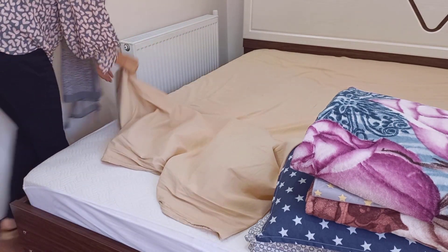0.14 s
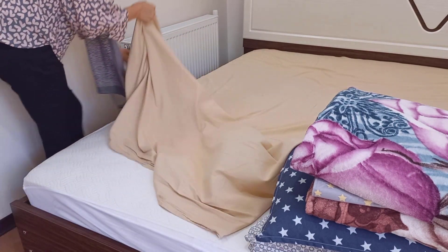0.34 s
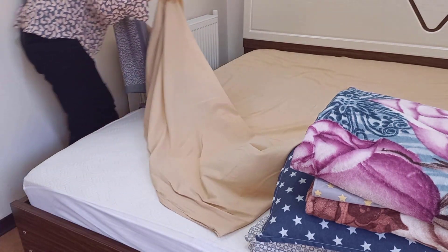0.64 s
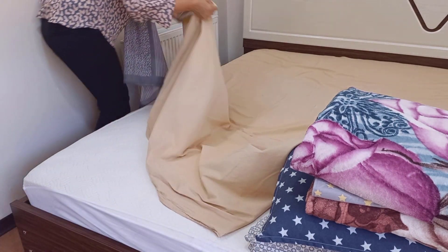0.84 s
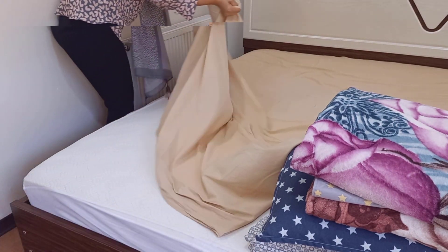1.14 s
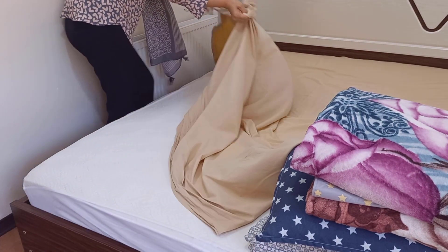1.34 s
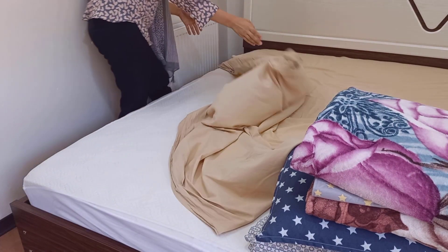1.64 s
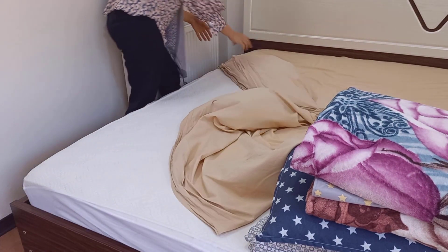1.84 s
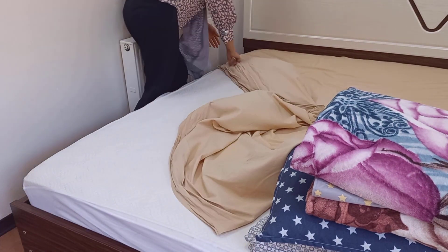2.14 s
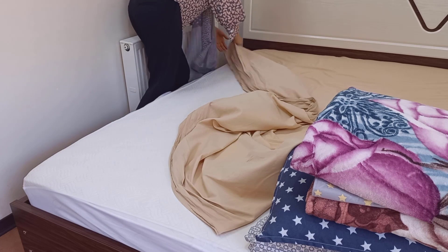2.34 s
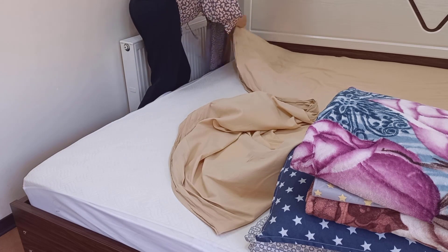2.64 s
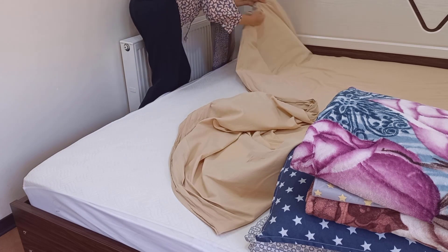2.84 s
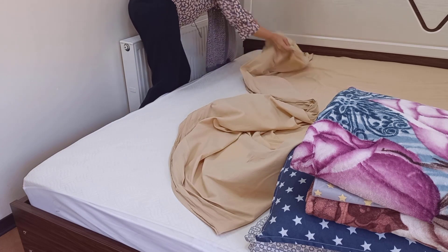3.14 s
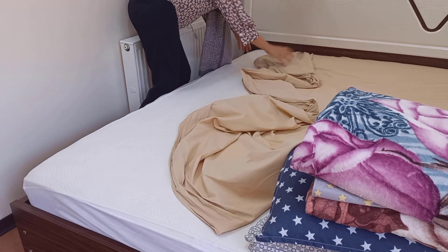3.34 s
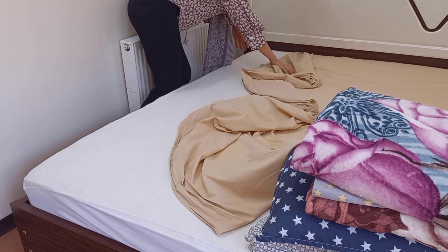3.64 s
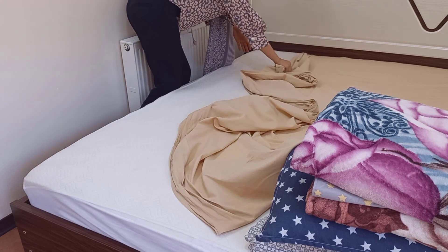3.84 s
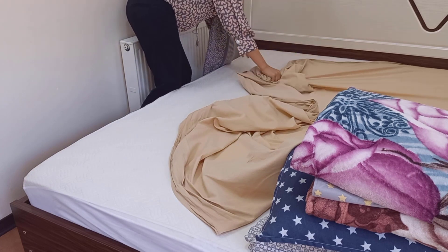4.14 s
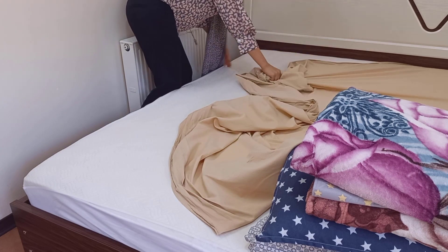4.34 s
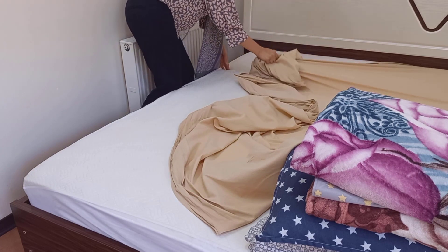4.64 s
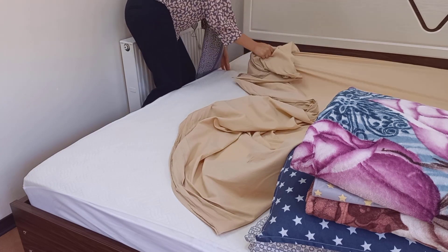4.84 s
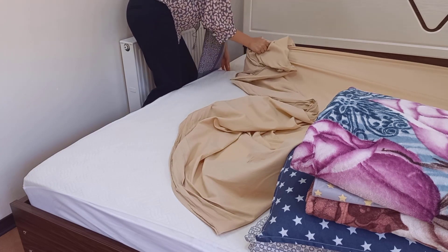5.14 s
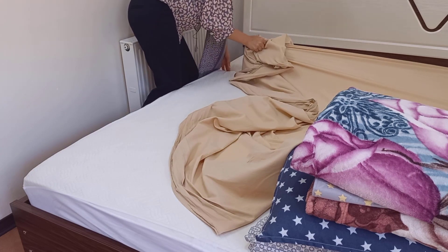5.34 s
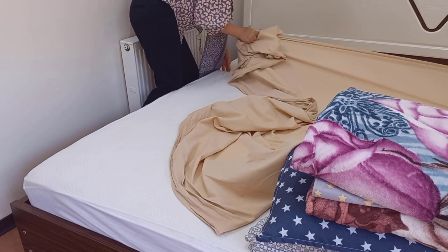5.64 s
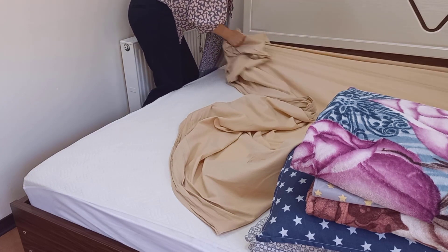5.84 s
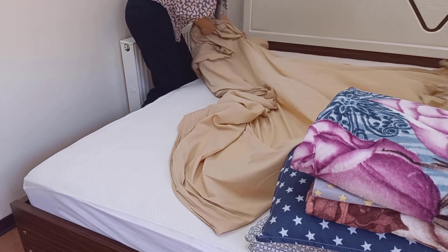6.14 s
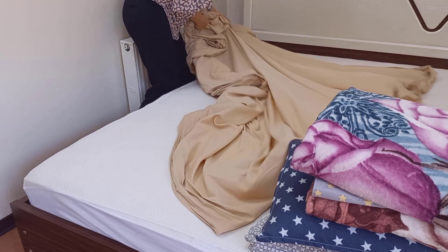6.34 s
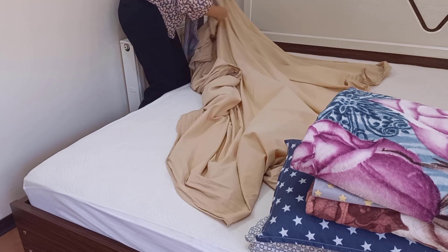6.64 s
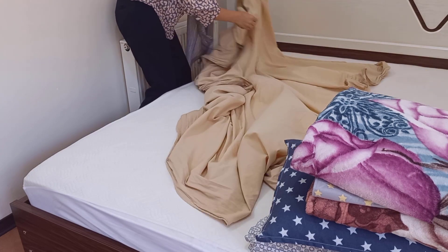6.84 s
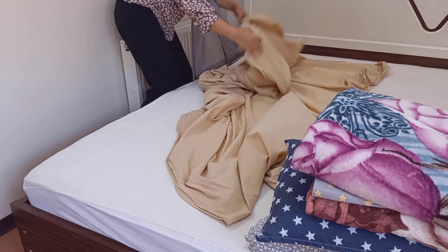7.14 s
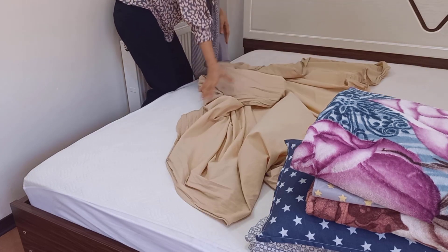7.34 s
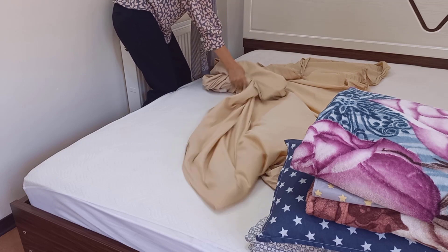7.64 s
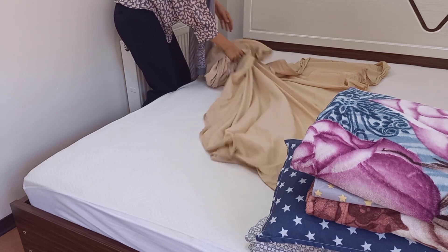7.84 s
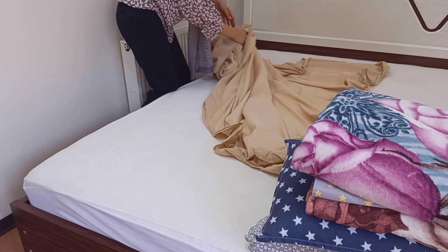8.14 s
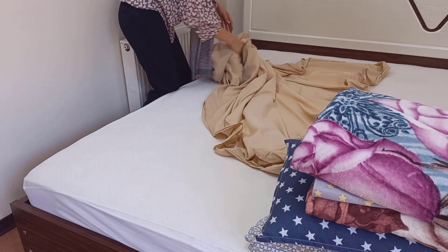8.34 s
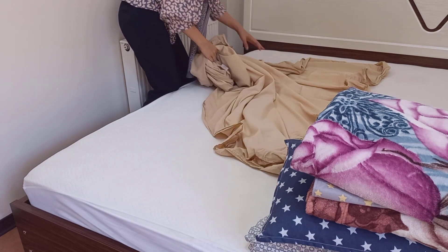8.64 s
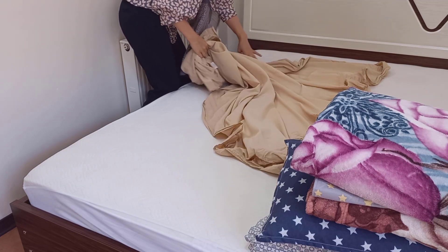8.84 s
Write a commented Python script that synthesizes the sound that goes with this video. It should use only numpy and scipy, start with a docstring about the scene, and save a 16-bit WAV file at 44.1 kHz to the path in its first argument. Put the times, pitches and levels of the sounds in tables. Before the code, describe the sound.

A small bedroom murmurs steadily and quietly while a cotton sheet is worked over a mattress, heard close in stereo, slightly left. From 0 s, pulls make breathy swishes, with a rising whirr of cloth in the first third of a second. At about 1.1 s a flap cracks into a huge low boom with quick after-thumps; at 1.7 s a second, softer-edged but equally heavy whoomp follows, both overloading. Between 2 and 3.3 s, short rustles and lighter thuds. From 3.5 to 5.4 s, uneven rubbing and dragging, with low bed rumbles strongest near 4.8 and 5.1 s. Around 5.6 to 6.5 s the sheet is hauled briskly, the fullest swishing, then it quietens. Rustling returns at 7.5 s; sharp static snaps tick at 7.8 to 7.95 s, the last loudest. Soft, dull flaps and bed rumble come at 8.4 to 8.6 s, then a final small spark near 8.9 s.

```python
"""A cotton sheet is lifted, shaken and dragged across a mattress in a small, quietly murmuring bedroom.
From the start, pulls on the sheet make swishes of shaped noise, gliding noise bands whirr or swish dully
and the bed rumbles under leaning weight. From 0.8 s folds flap: noise puffs and slaps join decaying sine
room modes that boom, and the big thumps near 1.1 and 1.7 s overload the two closely spaced microphones.
From 7.8 s static sparks snap as tiny noise bursts, with a few last soft flaps among them."""
import sys
import numpy as np
from scipy import signal
from scipy.fft import irfft, next_fast_len
from scipy.io import wavfile

SR = 44100
rng = np.random.default_rng(int(sys.argv[2]) if len(sys.argv) > 2 else 0)


def dump(signal):
    """Clip the signal to [-1, 1] and save it as 16-bit WAV at the path in sys.argv[1]."""
    limited = np.clip(np.atleast_2d(signal).T, -1, 1)
    pcm = np.round(limited * 32767).astype(np.int16)
    wavfile.write(sys.argv[1], SR, pcm)


N = 396459
TIME = np.arange(N) / SR
BIN_HZ = np.fft.rfftfreq(next_fast_len(N), 1 / SR)


def from_db(db):
    """Decibels to amplitude gain."""
    return 10 ** (np.asarray(db) / 20)


def rms_one(x):
    """Scale to unit rms."""
    return x / np.sqrt(np.mean(x ** 2) + 1e-20)


def pan(x, left_db):
    """Make the left side louder than the right by left_db."""
    return x * from_db([[left_db / 2], [-left_db / 2]])


def add(track, s, sound):
    """Mix a sound into a track from time s on."""
    start = round(s * SR)
    track[..., start:start + sound.shape[-1]] += sound[..., :N - start]


def drift(rate):
    """Slow random wander with about `rate` turns a second: twice-smoothed noise of rms 1."""
    step = 40  # samples between the points of the wander
    settle = 2000  # points dropped while the filter settles
    r = np.exp(-2 * np.pi * rate * step / SR)
    noise = rng.standard_normal(N // step + settle + 2)
    slow = rms_one(signal.lfilter([1], [1, -2 * r, r * r], noise)[settle:])
    return np.interp(np.arange(N) / step, np.arange(len(slow)), slow)


def room_noise(spectrum):
    """Coloured noise as two microphones hear it in a room: mostly diffuse, partly direct; rms 1."""
    mic_spacing_m, sound_speed = 0.21, 343  # m, m/s
    left_lag_s, direct_share = 0.000439, 0.061  # direct sound: lag of the left side, share of the power
    ripple_spacing_hz, ripple_depth = 5.9, 1
    hz, level_db = np.transpose(spectrum)
    colour = from_db(np.interp(np.log(BIN_HZ + 1), np.log(hz), level_db))
    # an even ripple in the spectrum, as from a faint echo 0.17 s later,
    # roughens the low and middle tones
    ripple = np.cos(2 * np.pi * BIN_HZ / ripple_spacing_hz)
    colour *= 1 + ripple_depth / (1 + BIN_HZ / 3000) * ripple
    mid, side, straight = rng.standard_normal((3, 2 * len(BIN_HZ))).view(complex)
    # long waves reach both microphones alike, short ones do not
    alike = np.sinc(2 * BIN_HZ * mic_spacing_m / sound_speed) * 0.95
    diffuse = np.sqrt((1 + alike) / 2) * mid + np.sqrt((1 - alike) / 2) * side * [[1], [-1]]
    direct = np.array([straight * np.exp(-2j * np.pi * BIN_HZ * left_lag_s), straight])
    both = np.sqrt(1 - direct_share) * diffuse + np.sqrt(direct_share) * direct
    return rms_one(irfft(colour * both, next_fast_len(N))[:, :N])


def swell_and_die(swell, t60):
    """One second of an envelope that builds up (time constant in s) and dies away (60 dB in t60 s)."""
    t = TIME[:SR]
    return (1 - np.exp(-t / max(swell, 1e-4))) * from_db(-60 * t / t60)


def linger(power):
    """The room holds a sound for a moment: power in, level in dB out."""
    t60 = 0.29  # s
    keep = from_db(-120 / (t60 * SR))  # power falls 60 dB in t60
    return 10 * np.log10(signal.lfilter([1 - keep], [1, -keep], power + 1e-12))


def still_room():
    """The still room murmurs as steady coloured noise."""
    # Murmur colour. Each row: frequency in Hz, relative density in dB per Hz.
    murmur_spectrum = [(18, -34), (30, -52), (60, -3.5), (97, -1.5), (150, -8), (550, -8.5), (780, -8),
                       (1020, -7), (1400, -10.5), (1870, -12.5), (2700, -29.5), (5400, -31), (7000, -25.5),
                       (9400, -32), (15500, -32)]
    return from_db(-39.5) * room_noise(murmur_spectrum)


def pull_levels():
    """Each pull speeds up, holds and slows down, and each sound's amplitude is a power of the speed."""
    # Pulls on the sheet. Each row: start in seconds, speed-up in seconds, hold in seconds,
    # slow-down in seconds, cloth-on-cloth rub in dB, then in dB relative to the rub: brush on
    # the mattress, hiss of taut weave, drag of bunched cloth. All before lingering and trims.
    pull_rows = [(-0.1, 0.23, 0.31, 0.21, -38, 4, -3.5, 5), (0.129, .17, 0.044, 0.14, -31.5, -21, -6, 2.5),
                 (0.42, 0.072, 0.047, 0.12, -39.5, -8, 1, 6), (0.547, 0.078, 0.11, .1, -48.5, 7, 0.5, 12.5),
                 (0.718, 0.21, 0.094, 0.13, -30.5, -5, -4.5, 0.5),
                 (0.994, .06, 0.069, .14, -38, 7.5, -3, 4), (1.25, .12, 0.27, .1, -61.5, 13.5, 3, 17),
                 (1.8, 0.12, 0.052, 0.32, -53, 8.5, -5, 21), (2.149, .09, 0.0092, .05, -40, 0.5, -6, 5.5),
                 (2.296, .11, 0.073, 0.23, -37, 1.5, -4, -1), (2.566, .12, .02, 0.12, -35, 0, -3.5, -4),
                 (2.7, 0.052, 0.037, 0.13, -37.5, 4, -8, 3.5), (2.98, 0.058, .02, .09, -53.5, 16, 3, 11),
                 (3.146, 0.085, 0.028, 0.11, -53.5, 11.5, -2, 16),
                 (3.504, 0.16, .1, 0.092, -50.5, 6, -2, -8), (3.674, 0.11, 0.1, .14, -42, 3, -9.5, 1),
                 (3.921, 0.072, 0.18, .09, -35.5, 3.5, -5, 1), (4.052, 0.049, 0.066, .13, -34, 4.5, -12, 3),
                 (4.25, .2, 0.092, .14, -49, 5, -5.5, 5), (4.52, 0.1, 0.072, .1, -48.5, -1, 2, -3),
                 (4.612, 0.22, 0.06, .3, -36.5, 0, -1.5, -2), (4.914, 0.15, 0.48, .16, -39, 0.5, -2, 0.5),
                 (5.545, 0.12, 0.042, 0.15, -27, 0.5, -1, 4),
                 (5.752, 0.15, 0.064, 0.079, -27.5, 0, -4, 3.5),
                 (5.97, 0.073, 0.087, 0.25, -34.5, 2.5, -10.5, 1),
                 (6.217, .21, 0.17, .17, -35, 2.5, -10.5, -3.5),
                 (6.72, 0.23, 0.43, .13, -62.5, 13.5, 3, 10), (7.494, 0.19, 0.23, 0.2, -33, 0, -10, -3),
                 (7.7, 0.17, 0.14, 0.13, -35, 1.5, -11, -2), (8.693, 0.056, 0.11, 0.12, -55, 6, 8.5, 7)]
    # rows of the result: brush, rub, hiss, drag
    speed_powers = np.array([[0.55], [0.79], [0.72], [0.85]])
    # the bunched cloth stirs faintly throughout: brush and drag never quite stop
    held_db = [[-54], [-np.inf], [-np.inf], [-49]]
    power = np.zeros((4, N)) + from_db(held_db) ** 2
    for s, rise, hold, fall, rub_db, brush_db, hiss_db, drag_db in pull_rows:
        t = TIME[(TIME >= s) & (TIME < s + rise + hold + fall)] - s
        ramp = np.interp(t, np.cumsum([0, rise, hold, fall]), [0, 1, 1, 0])
        speed = np.sin(np.pi / 2 * ramp) ** 2
        peak_db = rub_db + np.array([[brush_db], [0], [hiss_db], [drag_db]])
        add(power, max(s, 0), (from_db(peak_db) * speed ** speed_powers) ** 2)
    return linger(power)


def sliding_cloth(brush_db, rub_db, hiss_db):
    """Folds catch and slip as the sheet slides, and the threads add a fine grain."""
    # Colours of the mattress brush, cloth-on-cloth rub and taut-weave hiss.
    # Each row: frequency in Hz, relative density in dB per Hz.
    brush_spectrum = [(300, -24), (600, -0.5), (900, 1.5), (1300, 1), (2000, -5), (2900, -16), (6000, -50)]
    rub_spectrum = [(600, -13), (1500, -2.5), (2300, 2), (3000, 1), (4100, 0), (5500, -4.5), (7200, -8),
                    (9000, -13.5), (15000, -30)]
    hiss_spectrum = [(2500, -27), (5000, 0), (7000, 0.5), (8500, -3), (10000, 0), (12200, 2.5), (14000, 0),
                     (16000, -2.5)]
    brush_trim_db, rub_trim_db, hiss_trim_db = 3.0, 4.0, 5.0
    catch_db, grain_db = 0.5, 0.06  # rms wander of the level
    friction_db = catch_db * drift(31) + grain_db * drift(400)
    brush = from_db(brush_db + brush_trim_db) * room_noise(brush_spectrum)
    rub = from_db(rub_db + rub_trim_db) * room_noise(rub_spectrum)
    hiss = from_db(hiss_db + hiss_trim_db) * room_noise(hiss_spectrum)
    return from_db(friction_db) * (brush + rub + hiss)


def cloth_bands():
    """Moving cloth as bands of noise that glide, swell and fade: narrow ones whirr, wide ones swish dully."""
    # Pitched and breathy cloth bands: narrow ones whirr, wide ones are dull swishes and puffs of
    # moving cloth. Each row: start in seconds, length in seconds, start pitch in Hz, end pitch
    # in Hz, half-width of the band as a share of the start pitch, level in dB before panning.
    band_rows = [(0.0, 0.11, 784, 1044, 0.09, -31), (0.056, .22, 1050, 1987, 0.13, -32),
                 (0.849, 0.3, 2910, 3780, 0.16, -32), (1.72, 0.12, 2210, 2010, .13, -27),
                 (1.92, 0.18, 490, 461, 0.16, -33), (2.721, 0.25, 519, 431, .3, -32),
                 (3.262, 0.2, 451.4, 488, 0.36, -36), (4.047, 0.2, 245.4, 225.6, 0.19, -27.5),
                 (4.4, 0.233, 864, 812, 0.033, -38), (4.799, 0.25, 477.5, 559.6, 0.49, -29.5),
                 (5.605, 0.12, 406, 341, 0.2, -26.5), (5.821, 0.29, 652.5, 562, 0.17, -29.5),
                 (8.37, 0.359, 500, 430, 0.35, -34)]
    out = np.zeros((2, N))
    for s, length, start_hz, end_hz, width, level_db in band_rows:
        progress = np.minimum(TIME[:SR] / length, 1)
        pitch_hz = start_hz + (end_hz - start_hz) * progress
        phase = 2 * np.pi * np.cumsum(pitch_hz) / SR
        # slow noise on a carrier becomes a band around the gliding pitch
        unevenness = signal.butter(2, np.clip(width * start_hz, 5, 5000), fs=SR, output="sos")
        a, b = signal.sosfilt(unevenness, rng.standard_normal((2, 2, SR)))
        band = rms_one(a * np.cos(phase) + b * np.sin(phase))
        add(out, max(s, 0), from_db(level_db) * np.sin(np.pi * progress) * band)
    return out


def lean_level():
    """The bed's rumble swells and fades as weight leans on it; level in dB."""
    # Leans on the bed. Each row: start in seconds, length in seconds,
    # rumble in dB before lingering and trim.
    lean_rows = [(0.22, 0.22, -41), (0.68, .1, -40.5), (0.858, 0.16, -37), (2.76, 0.25, -36),
                 (3.7, 0.15, -40), (4.004, 0.17, -34.5), (4.46, 0.18, -40), (4.73, .16, -29.5),
                 (4.898, 0.15, -35), (5.08, 0.22, -29), (5.68, 0.54, -30.5), (6.33, 0.32, -38),
                 (7.06, 0.27, -37.5), (7.565, 0.8, -33), (8.56, 0.26, -28.5), (8.723, 0.36, -34)]
    resting_rumble_db = -49
    power = np.full(N, from_db(resting_rumble_db) ** 2)
    for s, length, level_db in lean_rows:
        swell = np.sin(np.pi * TIME[TIME < length] / length)
        add(power, s, (from_db(level_db) * swell) ** 2)
    return linger(power)


def moving_weight(rumble_db, drag_db):
    """The bunched cloth drags in lumps, and the bed drones softly around its lowest resonance."""
    # Colours of the bed rumble and the cloth drag.
    # Each row: frequency in Hz, relative density in dB per Hz.
    rumble_spectrum = [(20, -37), (45, -34), (65, -2.5), (85, -31), (101, 13), (120, -7.5), (170, -8.5),
                       (300, -9.5), (700, -67)]
    drag_spectrum = [(70, -31), (140, 0.5), (235, 1.5), (340, -0.5), (520, 0.5), (700, -9.5), (1000, -10.5),
                     (2000, -33.5)]
    rumble_trim_db, drag_trim_db = 0.5, 1.5
    lumps_db = 0.6 * drift(6.9)
    rumble = from_db(rumble_db + rumble_trim_db) * room_noise(rumble_spectrum)
    drag = from_db(drag_db + drag_trim_db + lumps_db) * room_noise(drag_spectrum)
    return pan(rumble, left_db=-3.5) + pan(drag, left_db=3.0)


def flaps():
    """Each flap shoves air into the room's standing waves; which ones answer depends on where it happens."""
    # Flaps of the sheet. Each row: start in seconds, room ring in dB before its trim, dull puff of air
    # in dB, bright slap in dB (both before their envelopes), swell time of the ring and puff in
    # seconds, place in the room from 0 to 1.
    flap_rows = [(0.769, -26, -36, -70, 0.03, 1), (1.089, 4, -3, -33, 0.0025, 0.43),
                 (1.118, -1.5, -12.5, -30.5, 0.0015, 0.13), (1.15, -7.5, -24, -59, 0.0023, 0.32),
                 (1.717, 3, 3.5, -17.5, 0.034, 1), (2.717, -19.5, -25, -41, .015, 1),
                 (2.788, -21.5, -22, -41, 0.0072, 1), (2.914, -30, -30, -63, 0.0077, 0.5),
                 (3.239, -41, -30.5, -62, 0.015, 0.7), (4.098, -29.5, -27, -33, 0.008, 0.1),
                 (5.61, -42, -28, -40, 0.039, 0.5), (8.385, -18.5, -18.5, -75, 0.032, 0.23),
                 (8.436, -21.5, -32, -66, 0.011, 0.05), (8.514, -25, -26.5, -62, 0.008, 0.1),
                 (8.6, -27.5, -26, -70, 0.027, 0.06)]
    # Standing waves of the room. Each row: frequency in Hz, 60 dB decay time in seconds,
    # answer in dB to a flap at place 0, answer in dB to a flap at place 1.
    mode_rows = [(60.3, 0.34, -8.5, -25), (75.7, 0.52, -37, -12), (100.8, 0.33, -0.5, -38),
                 (121.9, 0.41, -6, -14), (138.2, 0.24, -11, -0.5), (160.2, 0.29, -9, -2),
                 (196.5, 0.31, 3.5, -10), (210.9, .38, -26, -9), (237.4, 0.53, -20, -10.5),
                 (290, 0.23, -7, -30), (328.6, 0.43, -9.5, -12), (441, 0.29, -37, -17.5),
                 (510.6, 0.36, -24.5, -37)]
    # Colours of the puff and the slap. Each row: frequency in Hz, relative density in dB per Hz.
    puff_spectrum = [(20, -18), (45, -17), (75, 1.5), (150, 2), (240, -1), (350, -6.5), (500, -18.5),
                     (900, -24.5), (1600, -28), (4000, -63)]
    slap_spectrum = [(200, -32), (600, 0), (1200, 4.5), (2200, -1.5), (3000, -2.5), (4300, -4.5),
                     (6500, -10.5), (9000, -17.5), (15000, -25)]
    ring_trim_db = 2.5
    ring, puff, slap = np.zeros((3, N))
    for s, ring_db, puff_db, slap_db, swell, place in flap_rows:
        for k, (hz, t60, first_db, second_db) in enumerate(mode_rows):
            answer_db = np.interp(place, [0, 1], [first_db, second_db])
            # neighbouring modes start in opposite directions
            gain = (-1) ** k * from_db(ring_trim_db + ring_db + answer_db)
            add(ring, s, gain * swell_and_die(swell, t60) * np.sin(2 * np.pi * hz * TIME[:SR]))
        add(puff, s, from_db(puff_db) * swell_and_die(swell, t60=0.39))
        add(slap, s, from_db(slap_db) * swell_and_die(swell=0.0083, t60=0.6))
    return ring + puff * room_noise(puff_spectrum) + slap * room_noise(slap_spectrum)


def sparks():
    """Static snaps: a very short crack of noise, then its scatter from the walls."""
    # Static sparks. Each row: start in seconds, crack in dB, room tail in dB, before the envelopes.
    spark_rows = [(7.809, -12, -41), (7.8676, -8, -35), (7.9425, -2.5, -23.5), (8.743, -39, -38),
                  (8.8776, -17, -36)]
    # Colour of the crack. Each row: frequency in Hz, relative density in dB per Hz.
    crack_spectrum = [(1000, -24), (3000, -7), (6000, 1), (12000, 3), (16000, -0.5)]
    wall_delay = 0.0034  # s
    envelope = np.zeros(N)
    for s, crack_db, tail_db in spark_rows:
        add(envelope, s, from_db(crack_db) * swell_and_die(swell=0, t60=0.0033))
        add(envelope, s + wall_delay, from_db(tail_db) * swell_and_die(swell=0.001, t60=0.17))
    return envelope * room_noise(crack_spectrum)


def scene():
    """Cloth, thumps and sparks a little to the left, over the murmur of the still room."""
    brush_db, rub_db, hiss_db, drag_db = pull_levels()
    sheet = sliding_cloth(brush_db, rub_db, hiss_db) + cloth_bands() + sparks()
    weight = moving_weight(lean_level(), drag_db)
    return pan(sheet, left_db=1.5) + pan(flaps(), left_db=1.7) + weight + still_room()


def record(dry):
    """Overload flattens the big low waves while the hiss rides on through; the top is cut."""
    ceiling, overload_hz, cutoff_hz = 0.9, 2300, 15750  # full scale = 1, Hz, Hz
    excess = dry - dry / (1 + (dry / ceiling) ** 8) ** (1 / 8)
    # only the low part of the excess is taken away
    low_pass = signal.butter(2, overload_hz, fs=SR, output="sos")
    flattened = dry - signal.sosfiltfilt(low_pass, excess)
    top_cut = signal.ellip(12, 0.1, 80, cutoff_hz, fs=SR, output="sos")
    return signal.sosfilt(top_cut, flattened)


dry = scene()
out = record(dry)
dump(out)
```